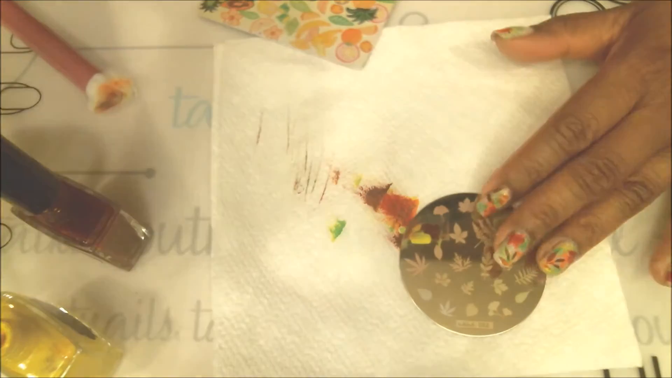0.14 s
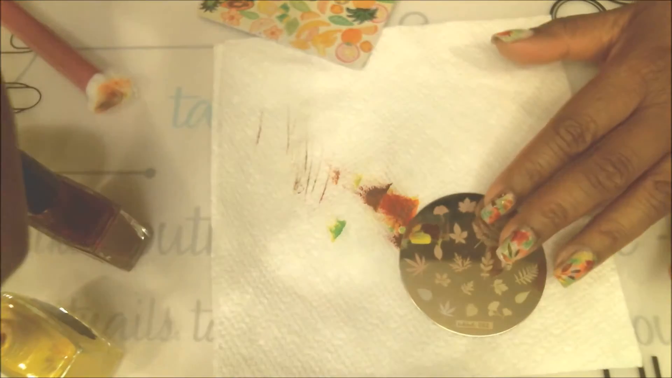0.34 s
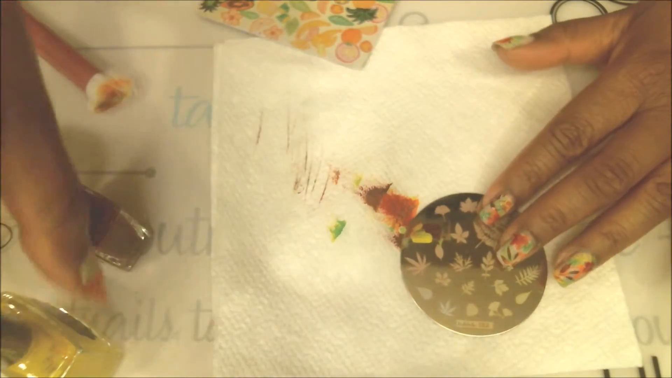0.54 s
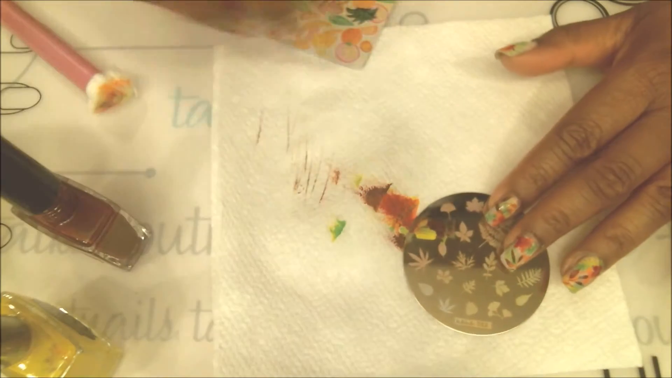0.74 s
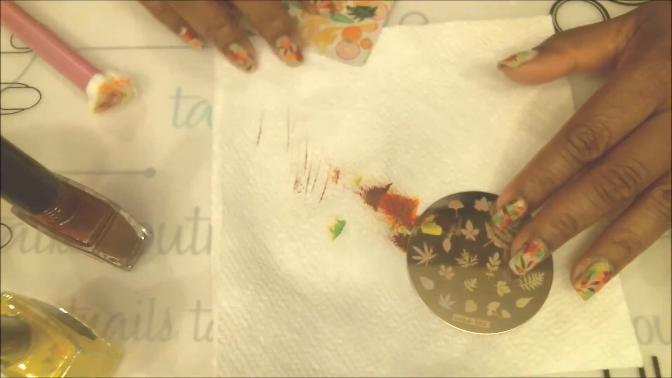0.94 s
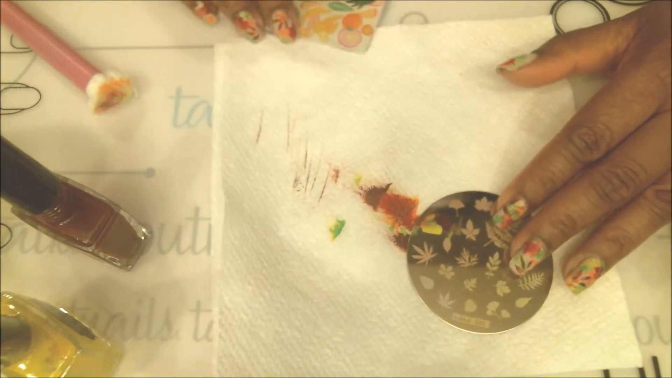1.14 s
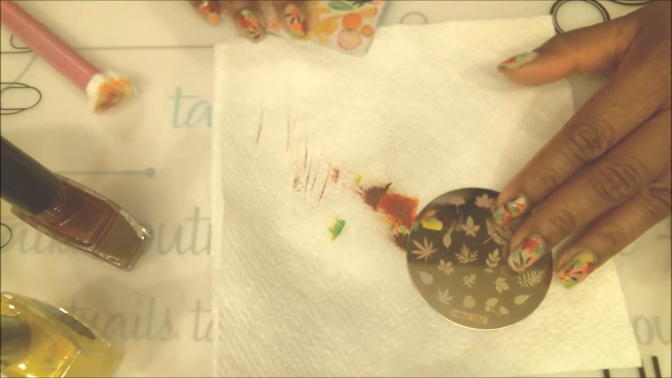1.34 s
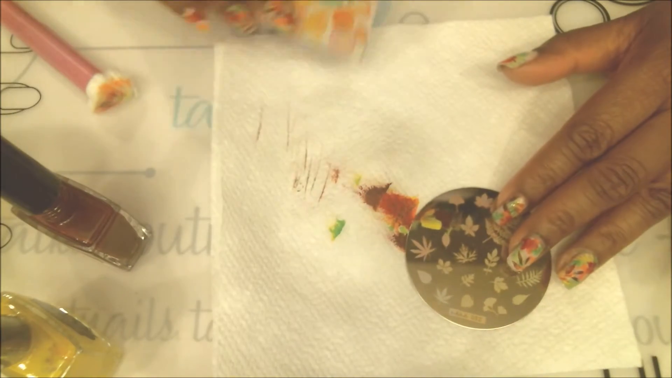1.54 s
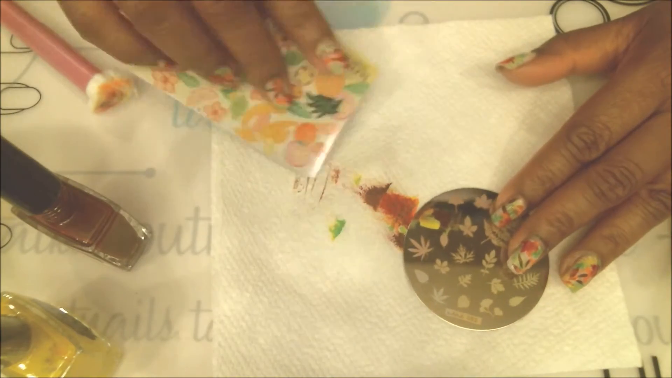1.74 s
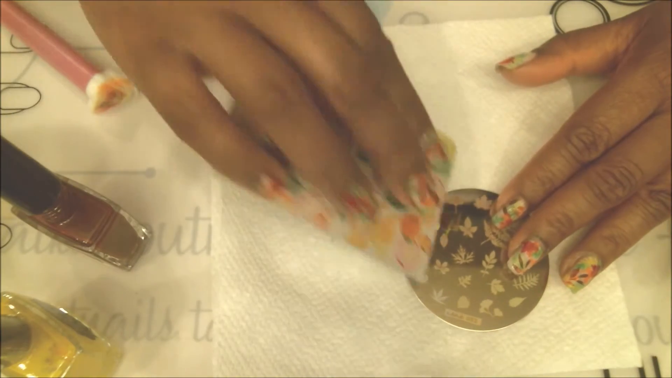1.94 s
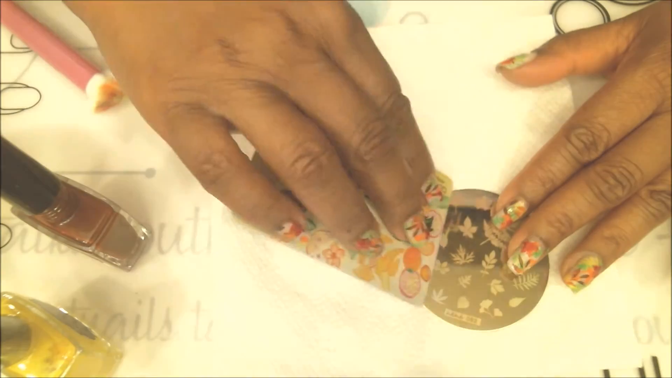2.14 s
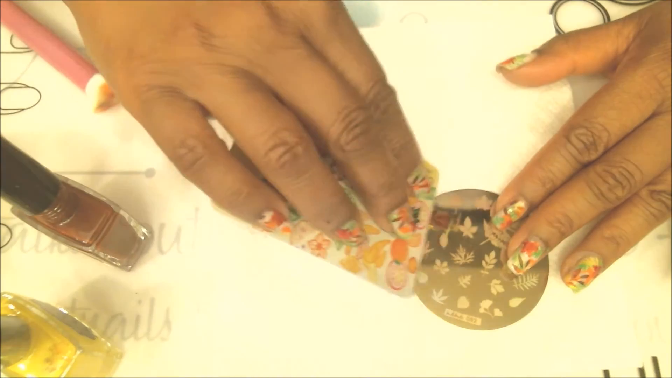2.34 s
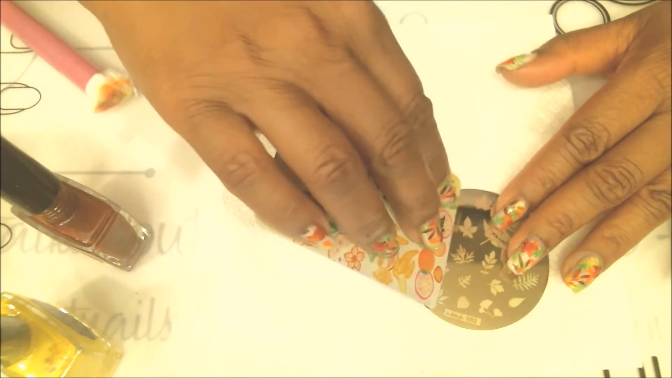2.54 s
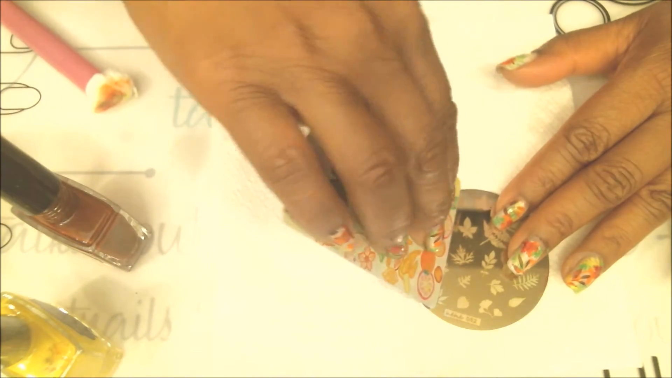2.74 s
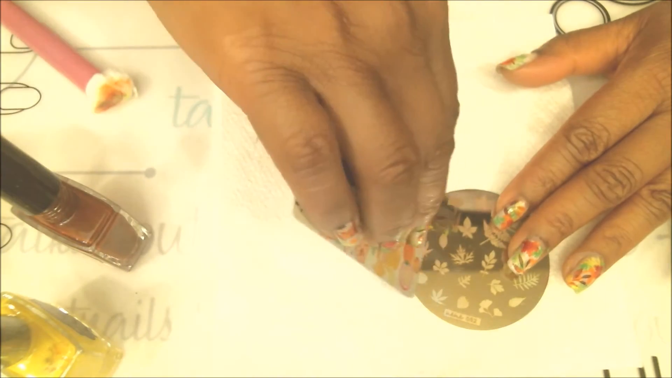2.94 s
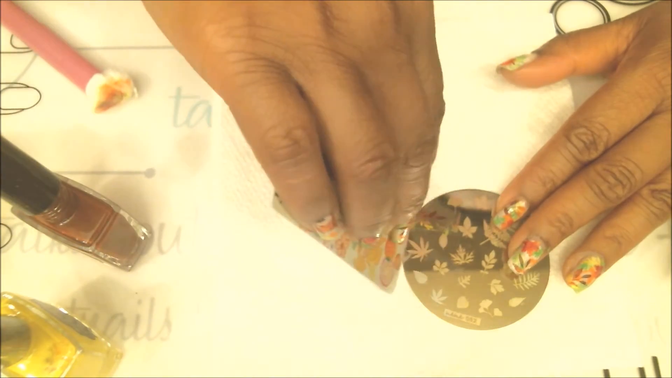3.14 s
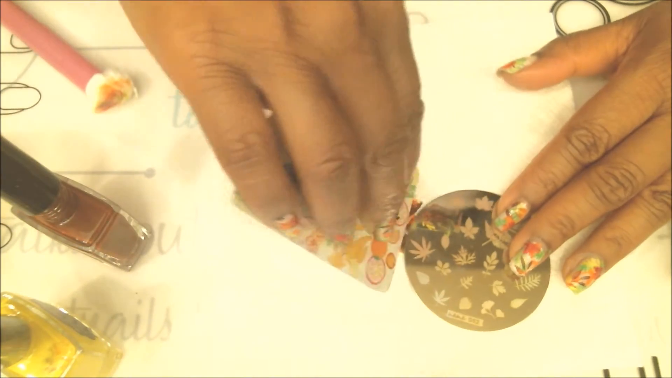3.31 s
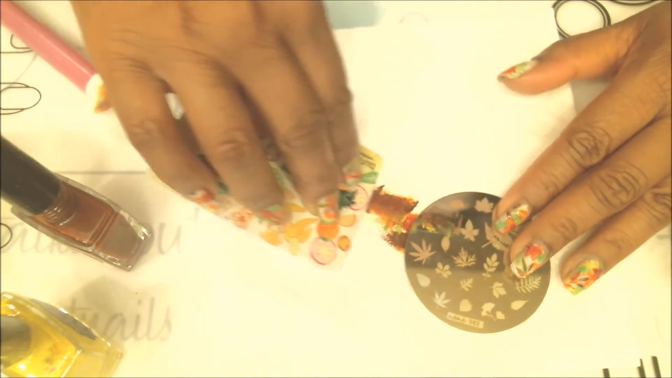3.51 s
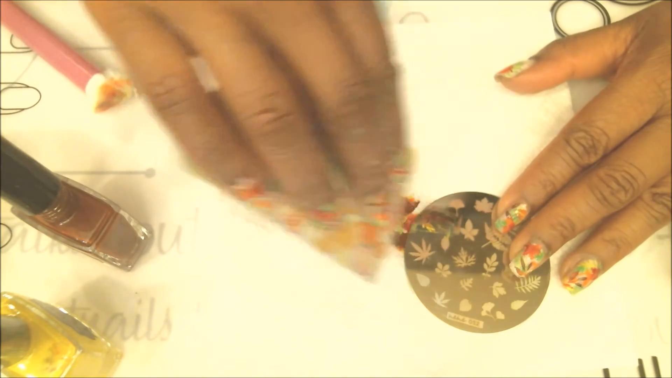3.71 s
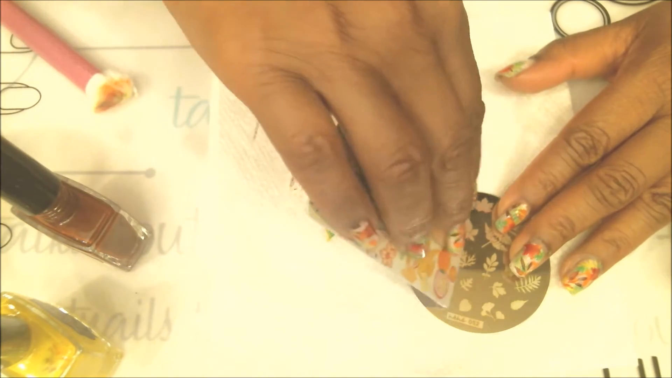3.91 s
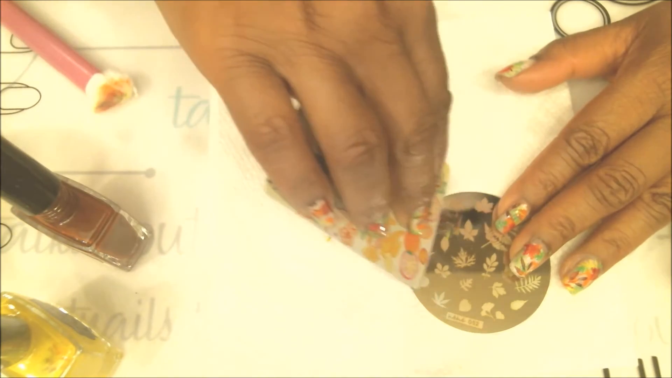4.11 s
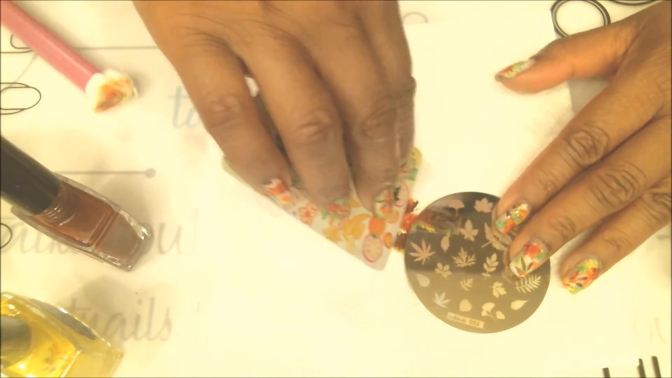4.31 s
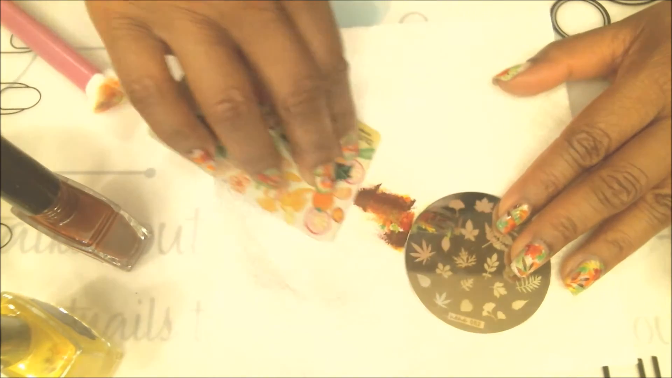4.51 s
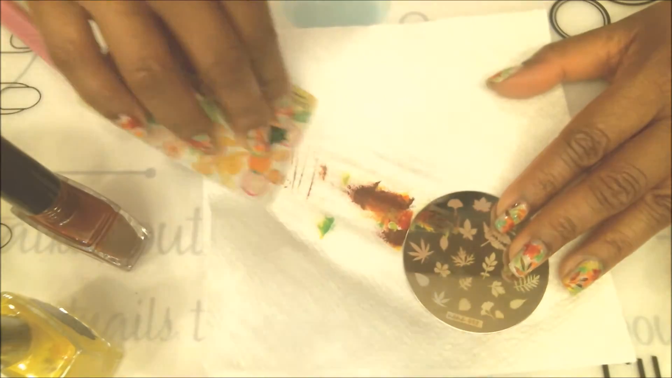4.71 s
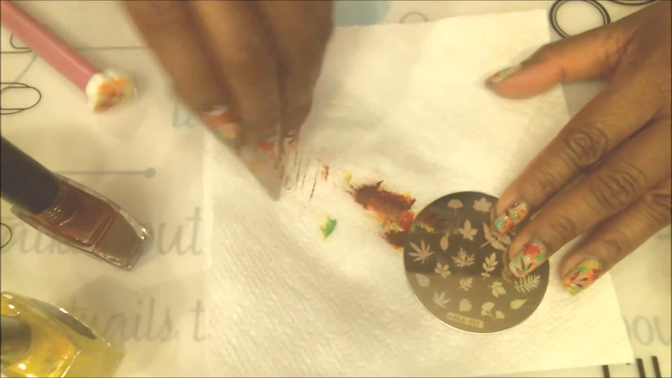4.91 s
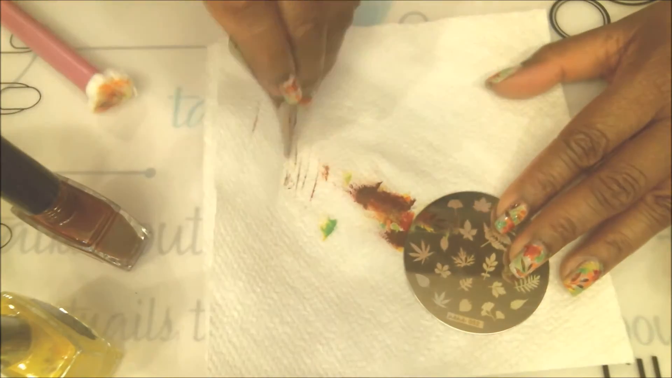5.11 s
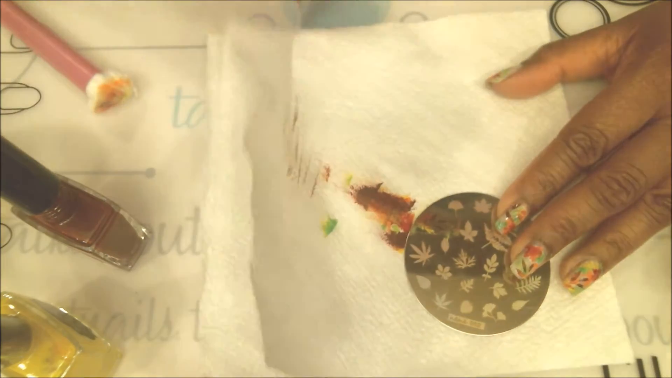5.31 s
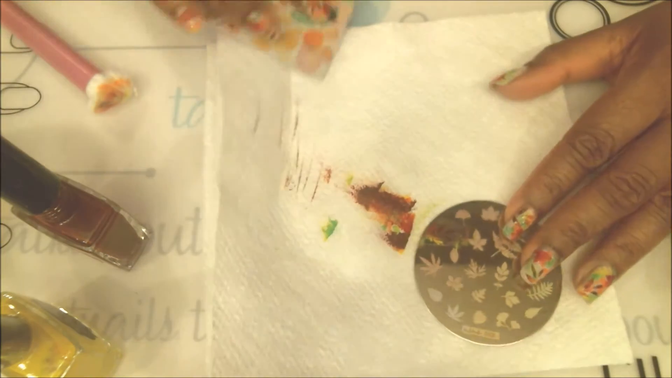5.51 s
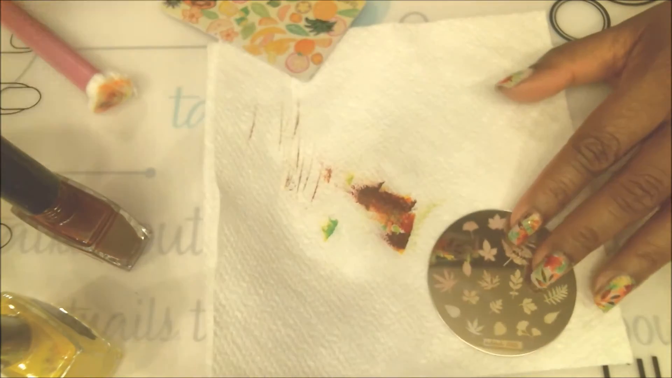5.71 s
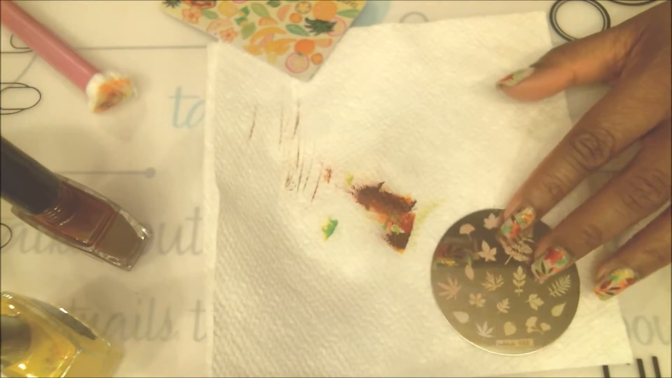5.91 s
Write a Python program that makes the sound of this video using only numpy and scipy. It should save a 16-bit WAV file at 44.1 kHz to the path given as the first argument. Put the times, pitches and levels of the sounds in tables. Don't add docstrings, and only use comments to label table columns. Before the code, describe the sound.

A thin plastic card scrapes with hissy strokes over a small metal plate, with sharp snaps off its edge, in a quiet room.

```python
import sys
import numpy as np
from scipy import signal
from scipy.fft import rfft, irfft
from scipy.io import wavfile
from scipy.ndimage import uniform_filter1d, minimum_filter1d

SR = 44100
rng = np.random.default_rng(int(sys.argv[2]) if len(sys.argv) > 2 else 0)


def voltage_ratio(decibels):
    exponent = np.asarray(decibels, float) / 20
    return 10 ** exponent


def pcm_store(signal):
    levels = np.round(np.clip(np.atleast_2d(signal), -1, 1) * 32767)
    wavfile.write(sys.argv[1], SR, levels.astype(np.int16).T)


N = 262395
TIME = np.arange(N) / SR


def evened(x):
    return x / np.sqrt(np.mean(x ** 2) + 1e-20)


def add(mix, s, sound):
    part = mix[round(s * SR):][:len(sound)]
    part += sound[:len(part)]


def resonate(x, hz, width):
    r = np.exp(-np.pi * width / SR)
    return signal.lfilter([1 - r * r, 0, r * r - 1], [2, -4 * r * np.cos(2 * np.pi * hz / SR), 2 * r * r], x)


def ring(hz, t60, t):
    return np.sin(2 * np.pi * hz * t) * voltage_ratio(-60 * t / t60)


def bandpass(x, order, low_hz, high_hz):
    return signal.sosfilt(signal.butter(order, (low_hz, high_hz), "band", fs=SR, output="sos"), x)


def controls(tables, fade=0.007):
    s, *columns = np.concatenate(tables).T
    playing = sum((TIME >= rows[0][0]) & (TIME <= rows[-1][0]) for rows in tables)
    shut = 1. - playing.clip(0, 1)
    gate = minimum_filter1d(1 - minimum_filter1d(shut, size=601), size=601)
    return uniform_filter1d(gate, int(fade * SR)), [np.interp(TIME, s, c) for c in columns]


def swells(rows):
    climb_db = 30
    t = np.arange(0, N + 32, 32) / SR
    s, rise, fall, db = np.transpose(rows)[:4, :, None]
    steps = np.where(t < s, (s - t) / abs(rise), (t - s) / abs(fall))
    return t, voltage_ratio(db - climb_db * np.minimum(steps, 6)) ** 2


def swelling(rows):
    t, power = swells(rows)
    return np.interp(TIME, t, np.sqrt(power.sum(0)))


# (f/Hz, level/dB per Hz)
ROOM_TONE = [(35, -48), (60, -28.5), (113, -9), (189, -5), (553, -11.5), (903, -6.5), (1200, -9.5),
             (1440, -21), (1780, -10.5), (1950, -19.5), (2650, -23.5), (3120, -21), (4530, -30),
             (13000, -34), (15650, -32), (15850, -71.5)]


def room():
    f, db = np.transpose(ROOM_TONE)
    colour = voltage_ratio(np.interp(np.log(np.fft.rfftfreq(N, 1 / SR) + 1), np.log(f), db))
    air = evened(irfft(rfft(rng.standard_normal(N)) * colour, N))
    port = evened(resonate(resonate(rng.standard_normal(N), 3250, 350), 3250, 500))
    return voltage_ratio(-72) * (air + voltage_ratio(-21.0) * port)


def camera(dip_ms=0.66, busy=0.44, lumps_db=6.0):
    frame_rate_hz, first_s = 30.0102, .0282
    at = (np.arange(first_s, N / SR, 1 / frame_rate_hz) * SR).astype(int)
    dips = np.zeros(N)
    dips[at] = voltage_ratio(-56.5 + 2.5 * rng.standard_normal(len(at)))
    u = np.arange(-100, 300) / SR * 1e3 / dip_ms
    shape = -np.where(u < 0, np.exp(-u ** 2 * 2), np.exp(-u ** 2 / 2.0))
    phase = (TIME - first_s + 0.0016) * frame_rate_hz % 1
    wander = uniform_filter1d(uniform_filter1d(rng.standard_normal(N), 1500), 700)
    lumps = voltage_ratio(lumps_db * evened(wander))
    storing = rng.standard_normal(N) * lumps * np.exp(-phase / busy)
    rumble = resonate(resonate(storing, 170, 180), 190, 360)
    return signal.oaconvolve(dips, shape)[100:N + 100] + voltage_ratio(-71) * evened(rumble)


def background(loud, depth_db=1.0, recovery=.5):
    active = uniform_filter1d(loud ** 2, 2000) > voltage_ratio(-56) ** 2
    held = signal.lfilter([1 / (recovery * SR)], [1, 1 / (recovery * SR) - 1], active)
    return (room() + camera()) * voltage_ratio(-depth_db * held)


def tick(db, hz, body_db, crack_db, t60):
    t = np.arange(2000) / SR
    t60 = max(t60, .003)
    puff = rng.standard_normal(2000)
    body_hz = 1140 * (1 + .04 * np.tanh(puff[0]))
    puff = puff + 5 * np.exp(-((t - .0003) / .00004) ** 2)
    contact = 1 - np.exp(-t / 0.00032)
    edge = bandpass(puff * contact * voltage_ratio(-60 * t / t60), 2, hz / 1.283, hz * 1.25)
    body = contact * ring(body_hz, 1.6 * t60, t)
    crack = bandpass(puff * contact * voltage_ratio(-60 * t / (0.25 * t60)), 3, 4600, 10500)
    return voltage_ratio(db) * (edge / abs(edge).max() + voltage_ratio(body_db) * body + voltage_ratio(crack_db) * crack / abs(crack).max())


# (t/s, peak level/dB, ring
# f/Hz, t60/s)
PRICKS = [(.0036, -52, 8000, .005), (.0036, -56, 3900, .005), (.0845, -57, 7000, .005),
          (1.2063, -57, 7000, .006), (1.2175, -62, 6000, .006), (1.2213, -60, 9000, .005),
          (1.2282, -38, 5800, 0.013), (1.2335, -44, 4800, 0.014), (3.9207, -22, 5600, .012),
          (3.9238, -27.5, 6000, .012), (4.272, -20.5, 5800, .02), (5.5701, -16, 6800, 0.0056),
          (5.686, -52, 6060, .006), (5.513, -52, 6500, .006), (4.2702, -22, 9600, .016),
          (3.1855, -19, 6200, .016), (3.921, -38, 10300, .012), (1.4935, -40, 5500, .01)]
# (t/s, peak level/dB, ring f/Hz, body rel level/dB, crack rel level/dB)
TAPS = [(0.0738, -47.5, 8300, -20, -16), (0.088, -79, 1840, 1, 10), (0.9056, -45.5, 3530, -20, -5),
        (1.228, -43.5, 1900, -3, 0), (1.493, -38, 2480, -29, 4), (2.088, -20.5, 3480, -39, -17),
        (2.088, -22, 5660, -40, -21), (2.5122, -39, 2950, -38, -3), (3.9208, -30.5, 3000, -25, 11),
        (3.9238, -28, 2850, -11.5, 2), (4.2700, -12.5, 3300, -10.5, -10), (3.1831, -18.5, 3300, -8, -22),
        (1.0905, -44, 3060, 1, 11), (3.641, -35.5, 3520, -30, -2), (5.672, -46, 1730, -17, -20),
        (4.9177, -69, 3330, 28.5, -12), (5.4755, -34, 7480, -29, -8), (5.567, -29.5, 4200, 10, 5),
        (5.5698, -12, 4200, -6, -4.5), (5.5835, -18, 2000, 5.5, -1), (5.6709, -26.5, 3720, -14, 0.5),
        (5.698, -55.5, 5220, -31.5, 8)]
# (t/s, peak level/dB, ring f/Hz, crack rel level/dB)
RATTLES = [(.1464, -62, 4630, -8), (.6988, -64, 4200, -17), (0.886, -56, 1770, -13), (5.65, -45, 1493, -20),
           (1.2341, -43.5, 1580, -8), (1.4122, -51, 2550, -16), (1.4679, -41.5, 1930, 0),
           (3.9364, -38, 2670, -19.5), (4.0697, -46, 2850, -2), (4.1506, -38.5, 2960, -20),
           (4.7737, -31.5, 2570, -12), (5.3232, -46.5, 1473, 0), (5.6146, -35, 3050, -14)]
# (t/s, peak level/dB, ring f/Hz, t60/s)
CATCHES = [(1.3707, -37.5, 2260, 0.048), (1.3764, -54, 2750, .012), (1.4358, -34, 2950, 0.012),
           (1.724, -54, 5500, .008), (1.7568, -43.5, 2800, 0.022), (2.0948, -37.5, 2930, 0.0055),
           (2.1328, -48.5, 3100, 0.0098), (2.5248, -45, 3140, .0075), (2.55, -33.5, 2930, 0.0077),
           (2.607, -57, 2140, 0.021), (2.841, -39.5, 3040, 0.01), (2.859, -39, 2950, 0.034),
           (2.983, -32.5, 3380, 0.028), (3.161, -42, 3500, 0.019), (3.278, -42, 2600, 0.015),
           (1.3677, -42, 2790, .012), (2.9471, -39, 3170, 0.011), (2.993, -37, 3000, .015),
           (4.036, -48, 2520, .012), (4.0676, -38, 2900, 0.014), (4.075, -39, 2870, 0.02),
           (4.187, -43, 2920, .014), (4.2403, -42, 2900, .012), (4.2465, -41, 2900, .01),
           (4.251, -38, 3000, 0.009), (4.3934, -39.5, 3000, 0.013), (4.474, -45, 2760, .012),
           (4.0967, -38, 3060, 0.0091), (4.2882, -27, 2740, 0.01), (5.5494, -50, 3890, .012)]


def small_contacts():
    catch_crack_db = -27.5
    rows = [(s, db, hz, -40, catch_crack_db, t60) for s, db, hz, t60 in PRICKS]
    rows += [(*row, 0.0097) for row in TAPS]
    rows += [(s, db, hz, -10.5, crack_db, 0.025) for s, db, hz, crack_db in RATTLES]
    rows += [(s, db, hz, -24, catch_crack_db, t60) for s, db, hz, t60 in CATCHES]
    out = np.zeros(N)
    for s, *contact in rows:
        add(out, s + .0006, tick(*contact))
    return out


# (peak t/s, rise t/s, fall t/s, pressure level/dB, lightness 0-1)
BRUSHES = [(0.02, 0.072, 0.06, -76.5, 0.83), (.086, .01, 0.033, -84, 0.93), (0.549, .02, .1, -74.5, 0.6),
           (.609, 0.059, 0.056, -83, 0.94), (.7, 0.018, 0.048, -75.5, 0.6),
           (1.236, 0.077, 0.044, -68.5, 0.8), (4.925, .03, .03, -72.5, 0.63),
           (5.228, .02, .05, -63.5, 0.65), (4.815, .03, 0.022, -75.5, 1.0),
           (1.366, 0.013, .03, -52.5, 0.41), (1.375, 0.014, .025, -47, 0.34),
           (1.45, 0.064, 0.12, -59.5, 0.48), (1.496, 0.13, 0.02, -52.5, 0.42),
           (1.715, 0.07, 0.16, -62.5, 0.24), (2.141, 0.027, .06, -68.5, 0.16),
           (2.288, 0.15, 0.047, -65, 0.58), (2.557, 0.1, 0.049, -68, 0.38),
           (3.122, 0.0155, .17, -61.5, .36), (3.176, 0.038, 0.034, -52, 0.4),
           (3.205, .012, 0.092, -52.5, 0.4), (3.93, .005, 0.068, -57, 0.45),
           (4.266, 0.027, 0.018, -47.5, 0.25), (5.815, 0.068, 0.14, -76, 0.66),
           (5.9, 0.03, 0.096, -76, 0.64)]
# (t/s, pressure level/dB, lightness 0-1)
REACH = [
    (0.89, -67.5, 0.48),
    (.93, -68.5, 0.62),
    (.975, -61.5, 0.61),
    (1.01, -61, 0.63),
    (1.076, -64, 0.66),
    (1.1, -65, 0.68),
    (1.13, -97.5, 0.55),
]
SETTLE = [
    (2.838, -74, 0.3),
    (2.847, -57.5, 0.25),
    (2.857, -47.5, 0.26),
    (2.89, -53, 0.46),
    (2.94, -55, 0.36),
    (2.975, -50, 0.37),
    (2.99, -45, 0.35),
    (3.024, -54.5, 0.48),
    (3.07, -88, 0.15),
]
WIPE = [
    (3.32, -77.5, 0.54),
    (3.33, -74, 0.66),
    (3.425, -48, 0.5),
    (3.554, -48.5, 0.45),
    (3.618, -64.5, 0.37),
    (3.644, -50.5, 0.45),
    (3.668, -58, 0.57),
    (3.692, -88.5, 0.5),
    (3.699, -83, 0.36),
]
SWEEP = [
    (4.01, -80, .55),
    (4.036, -62, .45),
    (4.07, -50.5, .36),
    (4.09, -51, 0.37),
    (4.14, -51, .4),
    (4.165, -51, 0.32),
    (4.21, -53.5, .42),
    (4.245, -48.5, .4),
    (4.29, -57, .44),
]
GLIDE = [
    (4.3, -52.5, .44),
    (4.392, -49.5, .44),
    (4.458, -52.5, .5),
    (4.504, -51.5, .49),
    (4.568, -47.5, 0.54),
    (4.745, -48, 0.51),
    (4.776, -40, 0.37),
    (4.801, -50.5, 0.47),
    (4.835, -76.5, .3),
]
PAPER_DRAG = [
    (4.95, -82.5, 0.52),
    (4.984, -57, 0.53),
    (5.042, -68.5, 0.69),
    (5.102, -58, .62),
    (5.155, -55, 0.51),
    (5.21, -66, 0.81),
    (5.3, -70, 0.87),
    (5.325, -58.5, 0.66),
    (5.36, -98, 0.6),
]
RETURN = [
    (5.4, -84, 0.59),
    (5.425, -68.5, .85),
    (5.46, -65.5, .78),
    (5.49, -56, 0.66),
    (5.54, -75, .55),
    (5.6, -62, .75),
    (5.667, -53, 0.49),
    (5.72, -86, 0.83),
]


def hand():
    gate, (drag_db, drag_light) = controls([REACH, SETTLE, WIPE, SWEEP, GLIDE, PAPER_DRAG, RETURN])
    drag = (gate * voltage_ratio(drag_db)) ** 2
    t, power = swells(BRUSHES)
    touch = np.interp(TIME, t, power.sum(0))
    touch_light = np.interp(TIME, t, np.transpose(BRUSHES)[4] @ power)
    total = drag + touch + 1e-24
    return np.sqrt(total), (drag * drag_light + touch_light) / total


# (f/Hz, level/dB per Hz)
SCRAPE = [(1000, -56), (1700, -26), (1990, -26), (2670, -4), (2870, 0), (3630, -5), (4070, -8), (4510, -5),
          (5600, -11), (6500, -8), (7340, -14), (8860, -14), (11700, -21), (13900, -35), (16000, -63)]
# (t/s, f/Hz)
SHEEN = [
    (4.98, 5200),
    (5.1, 8240),
    (5.27, 9400),
    (5.33, 8100),
]


def strokes():
    pressure, light = hand()
    grain = evened(uniform_filter1d(rng.exponential(1, N) - 1, 40))
    slips = rng.standard_normal(N) * voltage_ratio(1.5 * grain)
    hz, t, z = signal.stft(slips, SR, nperseg=512, noverlap=384)
    hz = hz[:, None] + 1
    hold = np.interp(t, TIME, light)
    force_db = np.interp(t, TIME, 20 * np.log10(pressure))
    paper = (t > PAPER_DRAG[0][0]) & (t < PAPER_DRAG[-1][0])

    firm_hz, light_hz = 2850, 3710
    freed = .5 + .5 * np.tanh((hold + 0.057 * paper - 0.59) / 0.022 / 2)
    flex_hz = firm_hz + (light_hz - firm_hz) * freed
    height_db = 15 - 26.5 * hold
    hump = np.exp(-(np.log(hz / flex_hz) / 0.36) ** 2)
    f, db = np.transpose(SCRAPE)
    colour = voltage_ratio(np.interp(np.log(hz * 2900 / flex_hz), np.log(f), db) + height_db * hump)

    tilt_db = np.maximum(0.52 * (force_db + 51.5) + 44.5 * (hold - .5), -25) - 3 * paper
    droop_db = 3.9 * np.minimum(tilt_db, .5) * np.log2(np.maximum(hz / 7500, 1)) ** 2
    upper = voltage_ratio(np.interp(np.log(hz), np.log(f), db) + droop_db)
    sheen_hz = np.interp(t, *np.transpose(SHEEN))
    upper = upper * voltage_ratio(paper * 9.5 * np.exp(-(np.log(hz / sheen_hz) / .3) ** 2))

    blotches = uniform_filter1d(rng.standard_normal(z.T.shape), 15, 0)
    patches = evened(uniform_filter1d(blotches, 6, 1)).T
    patchy = z * voltage_ratio(2.0 * patches)

    def coloured(mask):
        shaped = patchy * mask / np.linalg.norm(mask, axis=0)
        return evened(signal.istft(shaped, nperseg=512, noverlap=384)[1][:N])

    share = np.clip((hz - 4700) / 600, 0, 1)
    hiss = coloured(colour * np.sqrt(1 - share))
    fizz = coloured(upper * np.sqrt(share))
    fizz_db = -24 + 40 * light
    body = evened(resonate(resonate(slips, 1000, 400), 1170, 1300))
    return pressure * (hiss + voltage_ratio(fizz_db) * fizz + voltage_ratio(-25) * body) + rubs(slips)


# (t/s, level/dB, f/Hz, t60/s)
THUDS = [
    (0.5, -49, 72, .15),
    (3.19, -42, 110, .25),
    (4.9175, -22, 252, 0.04),
    (4.915, -32, 112, 0.096),
    (4.94, -38, 170, .15),
]


def thuds():
    out, t = np.zeros(N), np.arange(12000) / SR
    for s, db, hz, t60 in THUDS:
        add(out, s, -voltage_ratio(db) * ring(hz, t60, t) * (1 - np.exp(-t / 0.0027)))
    return out


# (f/Hz, width f/Hz, level/dB)
BOOM_MODES = [(143, 200, -2), (213, 11, 1), (269, 37, -3.5), (328, 22, 1.5)]
# (peak t/s, rise t/s, fall t/s, level/dB)
BOOMS = [(.574, 0.056, 0.022, -61), (.89, 0.02, 0.1, -57), (1.262, 0.096, 0.018, -56.5),
         (1.366, 0.016, 0.038, -54.5), (1.495, .03, .06, -68), (2.872, 0.083, .2, -64),
         (3.006, 0.19, .09, -58), (3.187, 0.0043, 0.1, -39), (3.25, 0.098, 0.052, -47),
         (3.496, 0.15, 0.064, -65), (4.16, 0.19, 0.086, -55.5), (4.275, .006, 0.12, -49),
         (4.36, 0.24, 0.028, -59.5), (4.788, 0.035, 0.098, -62.5), (4.93, 0.009, 0.092, -42),
         (4.99, 0.09, 0.021, -51.5), (5.328, 0.036, 0.045, -58), (5.57, 0.0076, 0.077, -49.5),
         (5.6, .03, 0.02, -49), (5.685, 0.33, .035, -60)]
# (peak t/s, rise t/s, fall t/s, level/dB)
KNOCKS = [(.89, 0.017, 0.042, -57), (1.262, 0.079, 0.019, -62.5), (1.366, 0.01, 0.11, -55),
          (1.47, 0.006, 0.065, -43.5), (1.495, 0.0048, 0.027, -42), (2.872, .04, 0.23, -63.5),
          (3.187, .004, 0.088, -65), (4.16, 0.054, 0.14, -72), (4.274, 0.005, .08, -53),
          (4.788, 0.04, 0.15, -52), (4.92, .004, 0.025, -51), (5.142, .006, 0.044, -52.5),
          (5.328, 0.026, 0.031, -57), (5.57, 0.0031, 0.1, -40), (5.61, .02, 0.054, -49.5)]


def table():
    shake = rng.standard_normal((2, N))
    boom = sum(voltage_ratio(db) * resonate(resonate(shake[0], hz, width), hz, 87) for hz, width, db in BOOM_MODES)
    knock = resonate(resonate(shake[1], 540, 160), 470, 290)
    return swelling(BOOMS) * evened(boom) + swelling(KNOCKS) * evened(knock)


# (peak t/s, rise t/s, fall t/s, level/dB, body f/Hz)
RUBS = [(0.886, 0.0082, .05, -60.5, 1160), (1.06, 0.11, 0.073, -60, 1370), (1.09, 0.1, 0.039, -56, 1280),
        (1.234, 0.017, 0.024, -53, 1470), (1.375, 0.012, 0.018, -38, 1295),
        (1.415, 0.0092, 0.087, -57, 1250), (2.876, 0.053, 0.071, -53, 1090),
        (2.993, 0.036, 0.081, -54, 1180), (3.19, 0.012, 0.045, -39, 990), (3.935, 0.02, 0.02, -53, 1150),
        (4.075, 0.017, 0.057, -60.5, 1010), (4.155, 0.017, 0.037, -48.5, 950),
        (4.272, 0.012, 0.081, -49, 1006), (4.786, 0.051, 0.045, -48, 1120), (4.8, .06, 0.043, -53, 2230),
        (1.372, 0.011, .03, -52, 2200), (5.225, 0.028, 0.035, -65, 1040), (5.57, 0.018, 0.11, -51, 1150),
        (5.618, 0.027, .05, -45.5, 1094), (5.65, 0.022, 0.061, -51.5, 1295)]


def rubs(slips):
    out = np.zeros(N)
    t, power = swells(RUBS)
    for (*_, hz), p in zip(RUBS, power):
        body = evened(resonate(resonate(slips, hz, 300), hz, 670))
        out += np.interp(TIME, t, np.sqrt(p)) * body
    return out


# (t/s, level/dB, f/Hz, length t/ms)
CREAKS = [
    (1.693, -51, 3000, 1.6),
    (1.697, -44.5, 2900, 1.4),
    (1.7095, -54, 2900, 1.2),
    (1.712, -48, 3050, 1),
    (1.7177, -52, 2950, 1.2),
    (1.725, -44, 2870, 0.79),
    (1.738, -59, 3100, 1.5),
    (1.7427, -55, 3050, 1),
    (1.754, -57, 2900, 1.5),
]


def creaks():
    out, t = np.zeros(N), np.arange(-300, 300) / SR
    for s, db, hz, ms in CREAKS:
        add(out, s + t[0], voltage_ratio(db) * np.sin(2 * np.pi * hz * t) * np.exp(-(t * 1e3 / ms) ** 2))
    return out


# (f/Hz, level/dB, t60/s)
PLATE = [(1007, 0, 0.067), (1616, -9, .05), (2470, -5, 0.034), (2750, -11.5, 0.067), (3380, 1.5, 0.017),
         (4197, -7.5, 0.053), (4470, 3.5, 0.031), (5900, -4.5, 0.02), (7110, 2, 0.022), (8600, -5.5, 0.023),
         (9770, -0.5, 0.02), (10520, -6.5, 0.027), (11480, -5.5, 0.018)]


def snap(db, low_db, chatter_ms, damping):
    t = np.arange(4000) / SR
    u = (t * 1e3 - .2) / .085
    lead = (1 - u ** 2) * np.exp(-u ** 2 / 2)
    chatter = rng.standard_normal(300) * np.exp(-t[:300] * 1e3 / max(chatter_ms, .2))
    contacts = chatter + 14 * (np.arange(300) == 6)
    low, *modes = (voltage_ratio(level) * ring(hz, t60 * damping, t) for hz, level, t60 in PLATE)
    low, middle, high = (np.convolve(contacts, m)[:4000] for m in (low, sum(modes[:6]), sum(modes[6:])))
    spray = np.diff(rng.standard_normal(4001)) * voltage_ratio(-60 * t / 0.0066)
    high = high + 0.9 * np.std(high[:200]) * spray
    low, middle, high = (p / abs(p).max() for p in (low, middle, high))
    return voltage_ratio(db) * (voltage_ratio(low_db) * low + 0.44 * middle + voltage_ratio(-6) * high + voltage_ratio(-6) * lead)


# (t/s, peak level/dB, low mode rel level/dB, chatter t/ms, t60 factor)
SNAPS = [
    (2.0889, -34, -19.5, 0.7, 0.77),
    (3.1849, -4, -14, 1.8, 0.75),
    (3.9218, -32, -28, 2.5, 0.6),
    (4.2710, -9.5, -11, 0.96, 0.48),
]


def snaps():
    out = np.zeros(N)
    for s, *blow in SNAPS:
        add(out, s, snap(*blow))
    return signal.sosfilt(signal.butter(4, 12000, fs=SR, output="sos"), out)


# (peak t/s, rise t/s, fall t/s, level/dB)
SHIVERS = [
    (2.095, .006, 0.03, -58.5),
    (3.198, .01, 0.096, -49),
    (3.93, .006, 0.062, -63.5),
    (4.28, .008, 0.042, -54.5),
]


def shiver():
    rattle = rng.standard_normal(N)
    modes = sum(voltage_ratio(-8 * np.log2(hz / 2500)) * resonate(rattle, hz, 200) for hz, db, t60 in PLATE[1:])
    return swelling(SHIVERS) * evened(modes)


def reflections(x, wet_db=-16, t60=0.054):
    t = np.arange(6000) / SR
    tail = rng.standard_normal(6000) * voltage_ratio(-60 * t / t60) * (t > .003)
    return x + voltage_ratio(wet_db) * signal.oaconvolve(x, tail / np.linalg.norm(tail))[:N]


def scene():
    hits = bandpass(reflections(snaps() + small_contacts()), 2, 350, 13500)
    hands = hits + thuds() + strokes() + table() + shiver() + creaks()
    return (hands + background(hands))[None]


def band_limit(x):
    return signal.sosfilt(signal.butter(12, 16440, fs=SR, output="sos"), x)


def record(dry):
    mix = signal.sosfiltfilt(signal.butter(2, 80, "high", fs=SR, output="sos"), dry)
    return band_limit(mix)


dry = scene()
out = record(dry)
pcm_store(out)
```